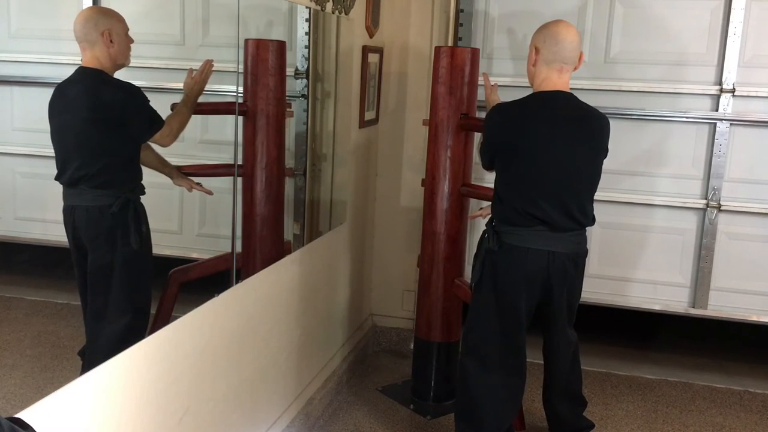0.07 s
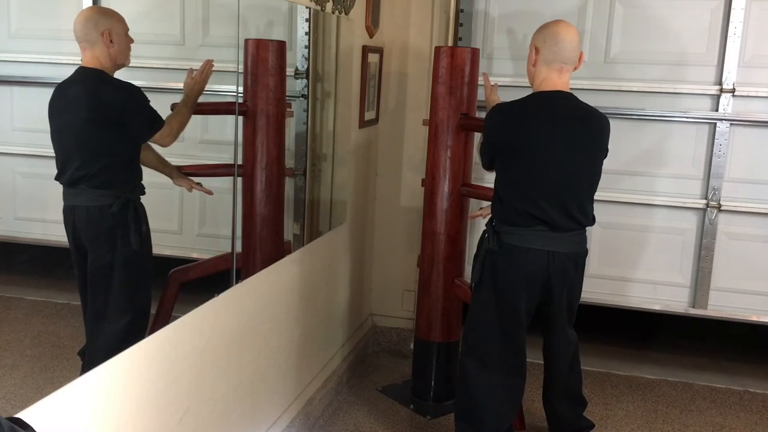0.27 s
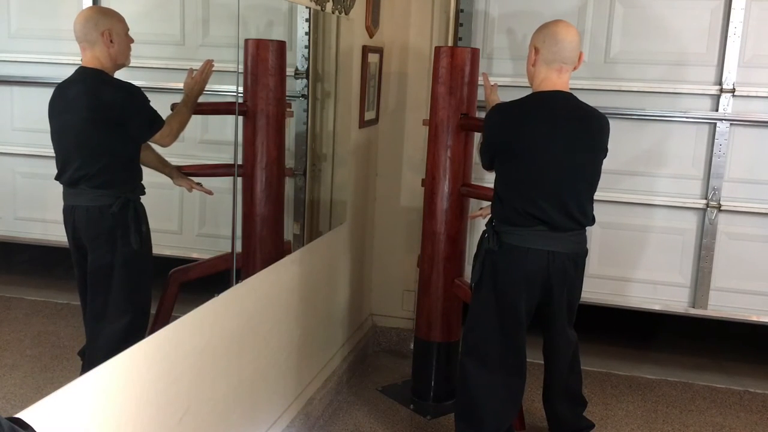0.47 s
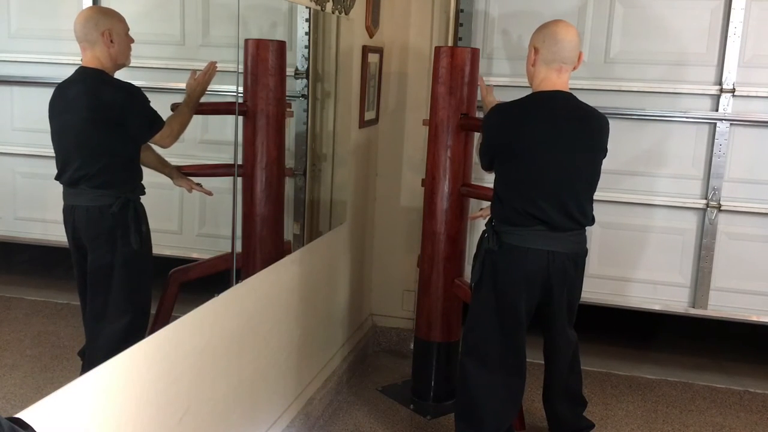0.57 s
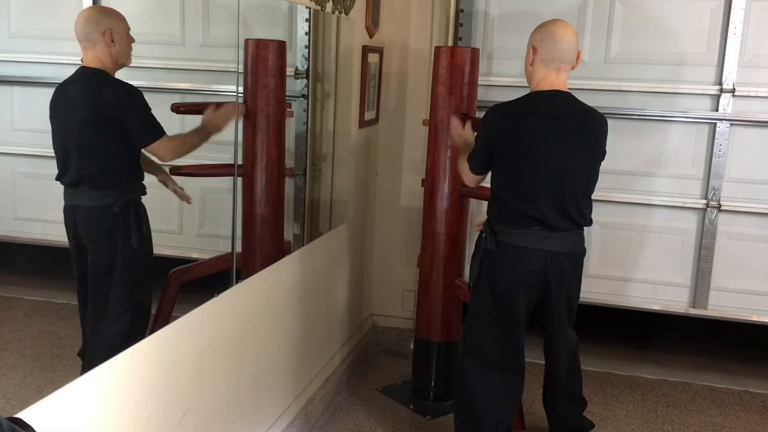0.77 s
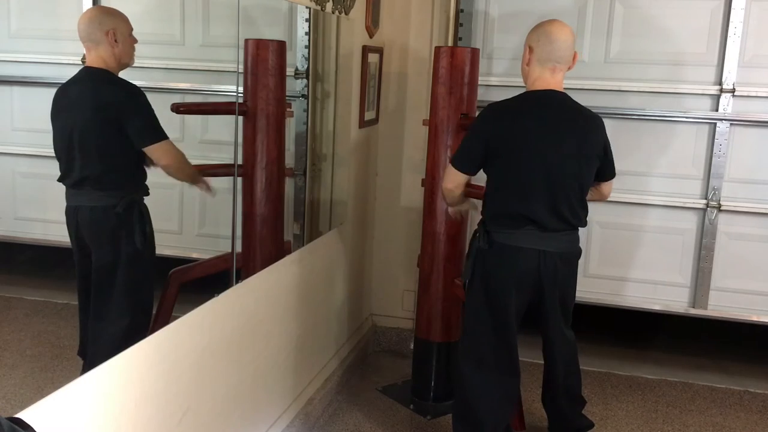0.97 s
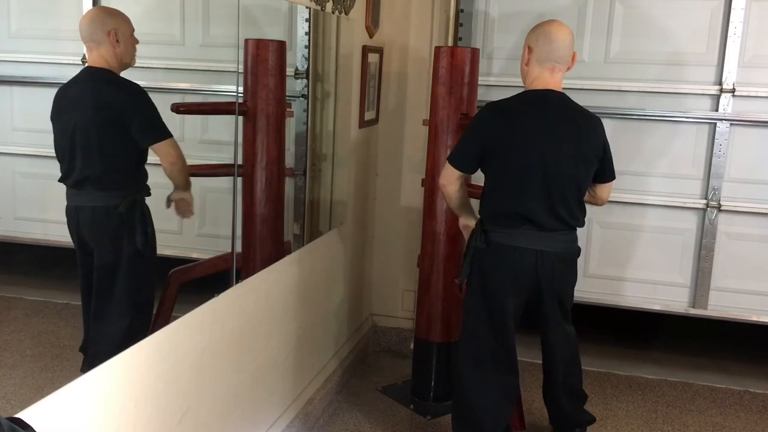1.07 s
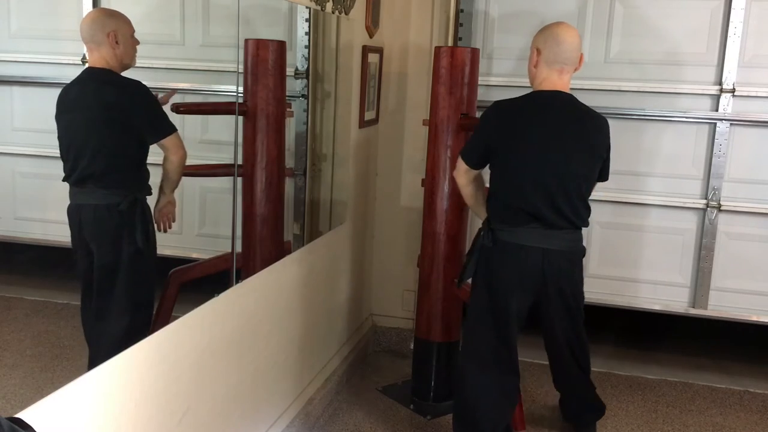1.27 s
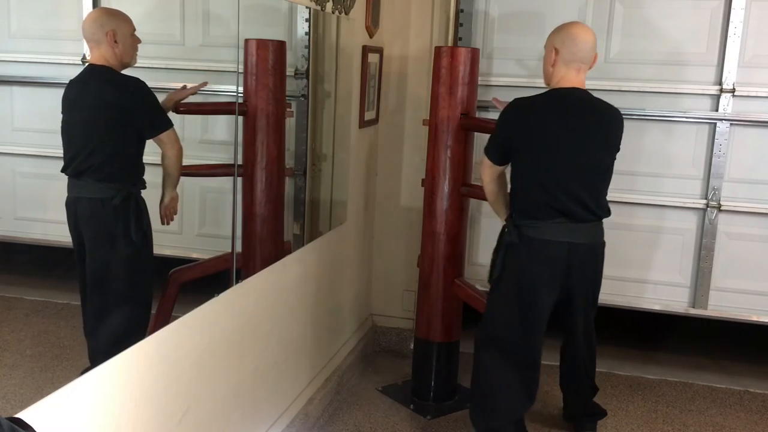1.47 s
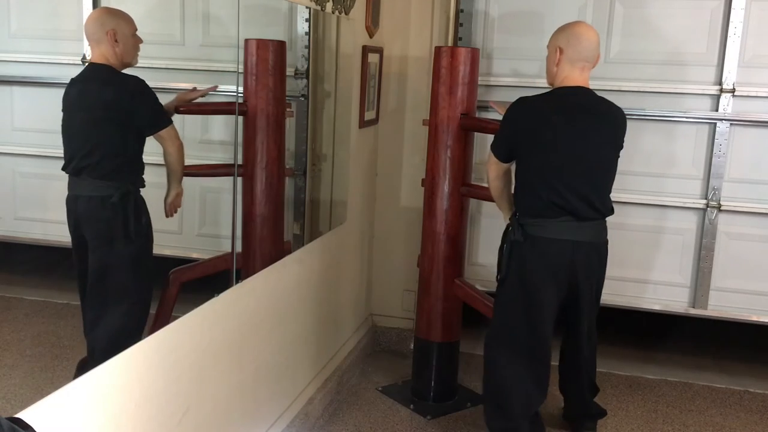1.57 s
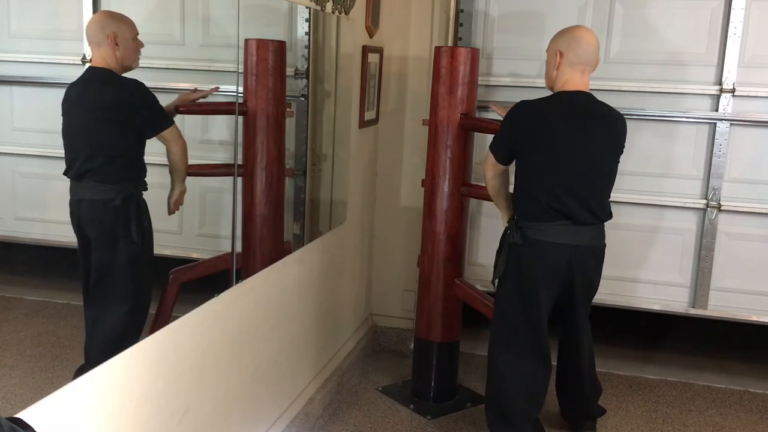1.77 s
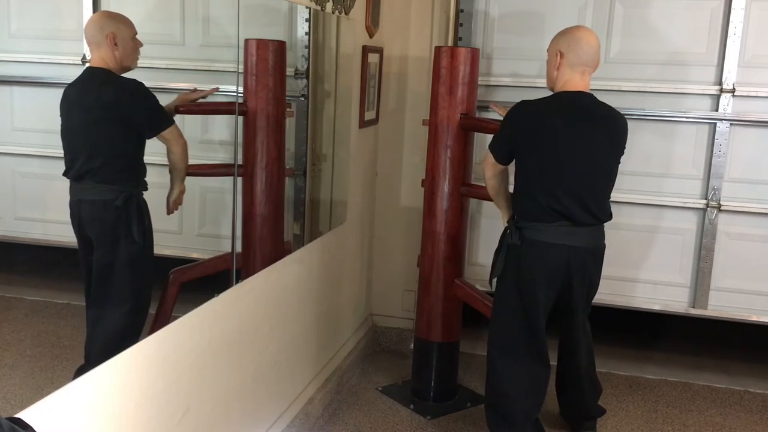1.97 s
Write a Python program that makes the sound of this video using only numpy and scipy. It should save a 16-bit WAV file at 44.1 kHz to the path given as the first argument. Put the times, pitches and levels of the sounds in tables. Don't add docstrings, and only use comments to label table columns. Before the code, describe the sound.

A hard wooden knock and rattle as a forearm hits a training dummy, late in a quiet, echoing garage; before it, a fading earlier knock, small clicks, foot shuffles and cloth rustle near the microphone.

```python
import sys
import numpy as np
from scipy import signal
from scipy.fft import rfft, irfft, next_fast_len
from scipy.io import wavfile

SR = 44100
rng = np.random.default_rng(int(sys.argv[2]) if len(sys.argv) > 2 else 0)


def level_to_linear(level):
    exponent = np.asarray(level, float) / 20
    return 10 ** exponent


def unload_audio(sound):
    columns = np.transpose(np.atleast_2d(sound))
    steps = np.round(np.clip(columns, -1, 1) * 32767)
    wavfile.write(sys.argv[1], SR, steps.astype(np.int16))


N = 88685


def unit(x):
    return x / np.sqrt(np.mean(x ** 2) + 1e-20)


def along(points, hz):
    f, value = np.transpose(points)
    return np.interp(np.log(hz + 1), np.log(f + 1), value)


def filtered(x, response):
    size = next_fast_len(N + SR // 2)
    spectrum = rfft(x, size) * response(np.fft.rfftfreq(size, 1 / SR))
    return irfft(spectrum, size)[:N]


def noise(response):
    return unit(filtered(rng.standard_normal(N), response))


def grainy(grain_db):
    grains_per_s = 900
    knots = np.minimum(rng.exponential(size=int(N * 1000 / SR) + 4), 3)
    flicker = np.interp(np.arange(N) * grains_per_s / SR, np.arange(len(knots)), knots)
    return unit(rng.standard_normal(N) * level_to_linear(grain_db * flicker))


def ring(modes, t):
    out = np.zeros(len(t))
    for hz, db, t60 in modes:
        level = level_to_linear(db + 2 * rng.normal() - 60 * t / t60)
        out += rng.choice([-1, 1]) * level * np.sin(2 * np.pi * hz * t)
    return out


def add(track, s, sound):
    part = track[round(s * SR):][:len(sound)]
    part += sound[:len(part)]


# (frequency [Hz], t60 [s])
ROOM_DECAY = [(150, 0.82), (500, 0.99), (1200, 1), (3000, 0.81), (6000, 0.75), (12000, 0.28)]
# (frequency [Hz], level [dB])
WALL_RETURN = [(200, -3), (1500, -1), (4000, -3.5), (6000, -8.5), (12000, -6)]


def room(x):
    wall_rise_s = 0.0029
    hz, t, z = signal.stft(rng.standard_normal(SR), SR, nperseg=256)
    level = along(WALL_RETURN, hz)[:, None] - 60 * t / along(ROOM_DECAY, hz)[:, None]
    tail = signal.istft(z * level_to_linear(level), SR, nperseg=256)[1]
    tail = tail * (1 - np.exp(-np.arange(len(tail)) / SR / wall_rise_s))
    return signal.fftconvolve(x, tail / np.linalg.norm(tail))[:len(x)]


# (frequency [Hz], density [dB per Hz])
AIR_COLOUR = [(20, -37), (60, 1.5), (115, 0), (190, -8), (400, -15.5), (900, -16.5), (2000, -31.5),
              (15500, -42)]
# (frequency [Hz], width [Hz], level [dB])
HUM_BANDS = [(65.6, 17, -66), (86, 6.2, -63), (116.7, 12, -66.5)]


def air():
    out = level_to_linear(-58.5) * noise(lambda f: level_to_linear(along(AIR_COLOUR, f)))
    for hz, width, db in HUM_BANDS:
        out = out + level_to_linear(db) * noise(lambda f: np.exp(-((f - hz) / width) ** 2))
    return out


# (frequency [Hz], level [dB], t60 [s])
EARLIER_MODES = [(217.7, 1, 0.1), (339.6, -3, 0.1), (657, -2, 0.014), (950, -4.5, 0.022), (1270, -1, 0.026),
                 (1720, -2.5, 0.0061), (2540, -16, 0.0046), (4000, 8, 0.001)]


def earlier_knock():
    level_db, ago_s = -36, 0.12
    t = np.arange(N + SR // 2) / SR
    tail = room(ring(EARLIER_MODES, t))
    return level_to_linear(level_db) * tail[round(ago_s * SR):][:N]


# (time [s], level [dB])
FOOT_EFFORT = [(0.745, -77), (0.755, -58.5), (0.871, -53), (1.203, -66.5), (1.211, -77.5), (1.377, -64.5),
               (1.381, -62), (1.549, -62), (1.675, -57.5)]
# (frequency [Hz], density [dB per Hz])
SOLE_COLOUR = [(100, -29), (160, -2.5), (300, 1.5), (700, -6), (2000, -6), (4500, -25.5), (9000, -26),
               (15600, -51)]
# (frequency [Hz], width [Hz], level [dB])
SOLE_RESONANCES = [(648, 43, 4), (990, 30, -11)]


def feet():
    def sole(f):
        rings = sum(level_to_linear(db) * np.exp(-((f - hz) / width) ** 2) for hz, width, db in SOLE_RESONANCES)
        return level_to_linear(along(SOLE_COLOUR, f)) * (1 + rings)

    s, db = np.transpose(FOOT_EFFORT)
    effort_db = np.interp(np.arange(N) / SR, s, db, left=-120, right=-120)
    return level_to_linear(effort_db - 1) * unit(filtered(grainy(grain_db=2), sole))


# (time [s], length [s], level [dB], centre frequency [Hz], grain [dB])
CLOTH_RUSTLES = [(.115, 0.0082, -74, 9500, 1), (0.823, 0.023, -62, 2040, 0), (0.816, 0.017, -73, 6600, -4),
                 (.957, .008, -63.5, 5600, -1), (0.976, 0.052, -67.5, 3460, -9),
                 (1.139, .04, -67, 3450, 4.5), (1.178, .02, -72, 5500, 6), (1.39, .02, -80, 6500, 12),
                 (1.47, 0.082, -71, 4000, 1), (1.59, .01, -71.5, 7000, 5), (1.64, .035, -63, 4000, 2),
                 (1.645, 0.065, -67, 7400, 4.5), (1.63, .04, -71.5, 13400, -4),
                 (1.955, .015, -69.5, 6000, 1.5)]


def clothes():
    octaves = 0.46
    out, t = np.zeros(N), np.arange(N) / SR
    for s, length, db, hz, grain_db in CLOTH_RUSTLES:
        rub = unit(filtered(grainy(grain_db), lambda f: np.exp(-(np.log2((f + 1) / hz) / octaves) ** 2 / 2)))
        out += level_to_linear(db) * np.exp(-((t - s) / length) ** 2 / 2) * rub
    return out


# (time [s], level [dB])
SEAM_SLIPS = [
    (1.104, -53),
    (1.110, -55),
    (1.113, -54),
    (1.115, -50),
]


def seam_creak():
    hz, t60_s = 6300, 0.003
    out, t = np.zeros(N), np.arange(400) / SR
    for s, db in SEAM_SLIPS:
        add(out, s, ring([(hz, db, t60_s), (hz * 1.3, db - 19, t60_s)], t))
    return out


# (time [s], peak level [dB])
JOINT_CLICKS = [
    (.7562, -46.5),
    (.7781, -48.5),
    (.8111, -49),
]


def joints():
    body_hz, body_db, body_t60_s = 575, 2, 0.03
    snap_t60_s, snap_top_hz = 0.0105, 8800
    out, t = np.zeros(N), np.arange(2000) / SR
    for s, db in JOINT_CLICKS:
        snap = filtered(rng.standard_normal(N), lambda f: 1 / (1 + (f / snap_top_hz) ** 4))[:len(t)]
        body = ring([(body_hz, db + body_db, body_t60_s)], t)
        add(out, s, level_to_linear(db - 60 * t / snap_t60_s) * snap + body)
    return out


def movement():
    out = feet() + clothes() + seam_creak() + joints()
    return out + level_to_linear(-5) * room(out)


# (frequency [Hz], level [dB], t60 [s])
TRUNK_MODES = [(164.85, -35.5, 0.76), (188.5, -36, 0.36), (239.2, -36, .3), (352, -44, .08),
               (536, -45, 0.09)]


def trunk(t):
    rise_s = 0.004
    return ring(TRUNK_MODES, t) * (1 - np.exp(-t / rise_s))


def metal_ping(t):
    hz, width_hz = 8890, 300
    level_db, t60_s, rise_s = -45, 0.022, 0.008
    metal = noise(lambda f: np.exp(-((f - hz) / width_hz) ** 2))[:len(t)]
    return metal * 4 * level_to_linear(level_db - 60 * t / t60_s) * (1 - np.exp(-t / rise_s)) ** 2


# (frequency [Hz], density [dB per Hz])
CLATTER_COLOUR = [(150, -81), (300, 2.5), (1000, -9), (2800, -6), (4400, -15.5), (6500, -26.5), (9500, -30),
                  (15500, -44)]


def clatter(t):
    level_db, t60_s, rise_s = -22.5, 0.056, 0.0048
    wood = unit(filtered(grainy(grain_db=3.5), lambda f: level_to_linear(along(CLATTER_COLOUR, f))))[:len(t)]
    return wood * level_to_linear(level_db - 60 * t / t60_s) * (1 - np.exp(-t / rise_s))


# (time [s], strength [dB], contact length [ms])
BLOW_CONTACTS = [
    (1.68, -35, .6),
    (1.685, -35.5, .5),
    (1.689, -31, 0.22),
    (1.697, -19, 0.27),
    (1.704, -20.5, 0.35),
    (1.95, -33.5, 0.52),
]
# (frequency [Hz], level [dB], t60 [s])
WOOD_MODES = [(707, 2, 0.017), (760, -8.5, 0.035), (876, -4.5, 0.035), (950, -0.5, 0.015),
              (1044, 1.5, 0.024), (1269, -2, 0.036), (1457, -4.5, 0.064), (1676, 0.5, 0.019),
              (1741, 4, 0.047), (1825, 5, 0.04), (2076, -4, 0.03), (2590, 3.5, 0.01), (2730, -29, 0.025),
              (3260, -10, 0.038)]


def contacts(t):
    out = np.zeros(N)
    for s, db, ms in BLOW_CONTACTS:
        width = SR * ms / 1000 / 3
        push = np.exp(-(np.arange(-60, 61) / width) ** 2 / 2)
        blow = signal.fftconvolve(ring(WOOD_MODES, t), push / push.sum())
        add(out, s, level_to_linear(db - 6) * blow[50:])
    return out


def strike():
    low_cut_hz = 120
    t = np.arange(SR // 2) / SR
    out = contacts(t)
    add(out, 1.6965, clatter(t))
    add(out, 1.705, metal_ping(t))
    add(out, 1.693, trunk(t))
    return filtered(out + level_to_linear(0.5) * room(out), lambda f: (1j * f / (low_cut_hz + 1j * f)) ** 3)


def scene():
    return (air() + earlier_knock() + movement() + strike())[None]


def low_pass(x):
    return signal.sosfilt(signal.butter(12, 15640, fs=SR, output="sos"), x)


def record(dry):
    return low_pass(dry)


dry = scene()
out = record(dry)
unload_audio(out)
```